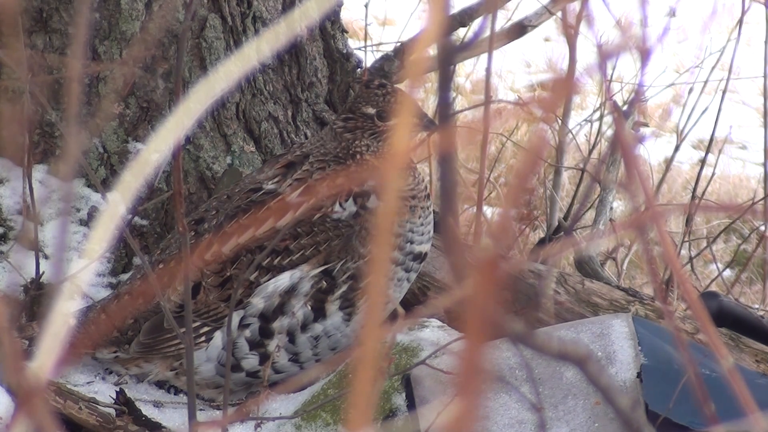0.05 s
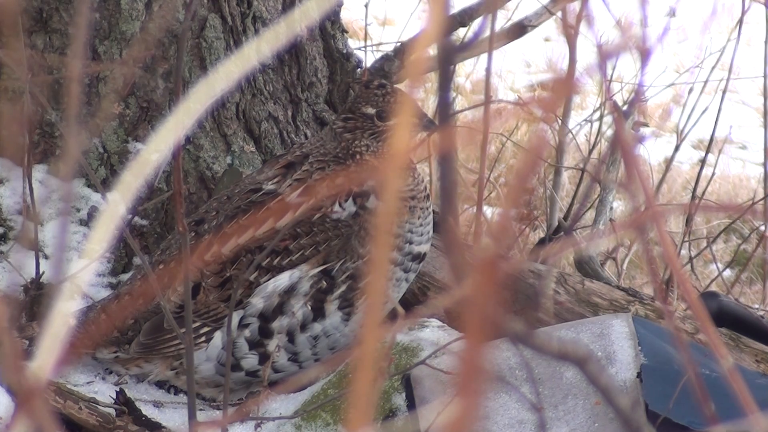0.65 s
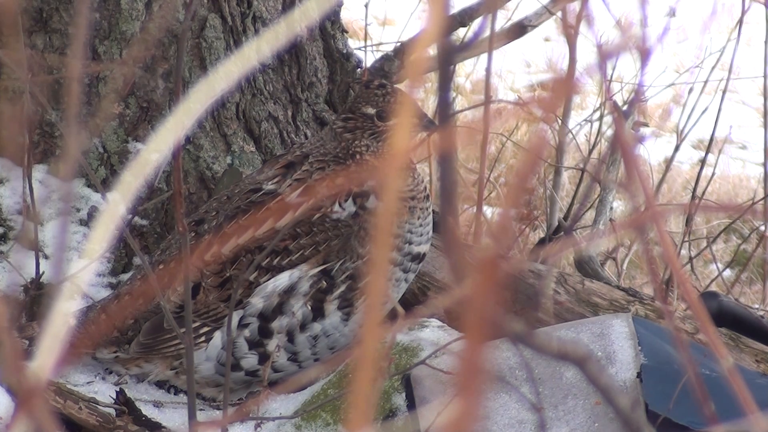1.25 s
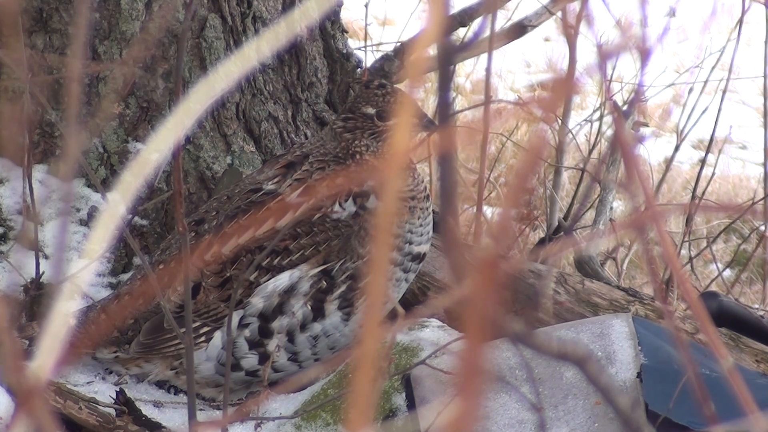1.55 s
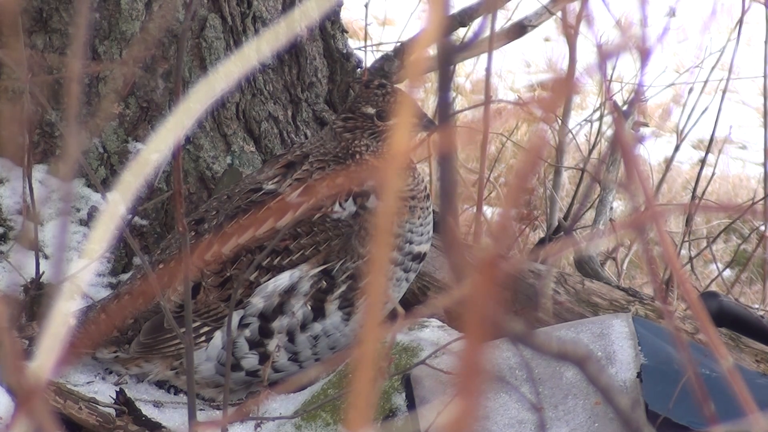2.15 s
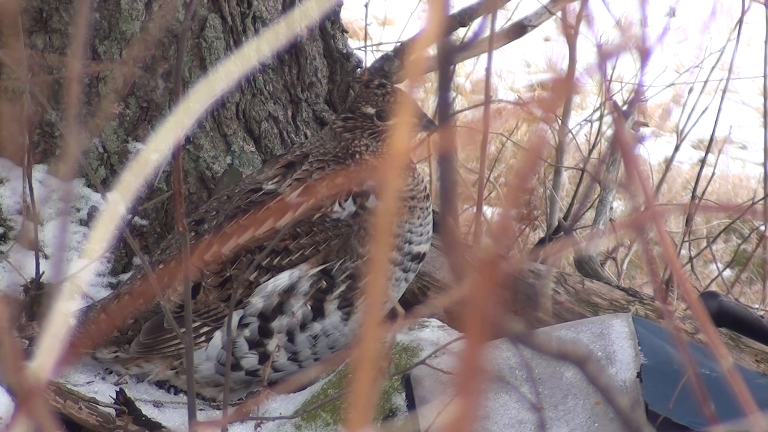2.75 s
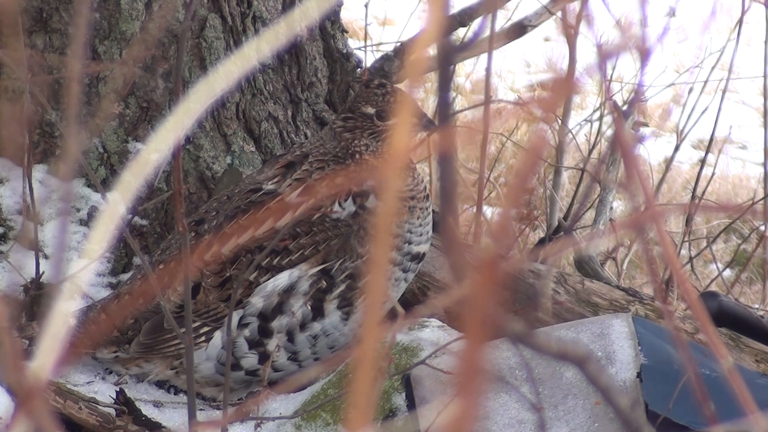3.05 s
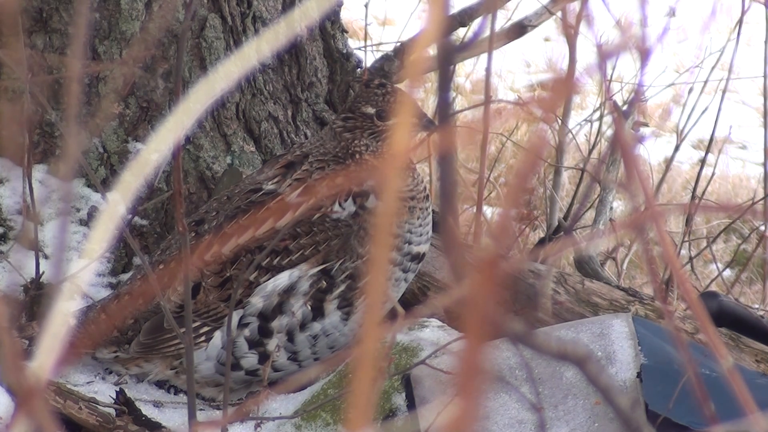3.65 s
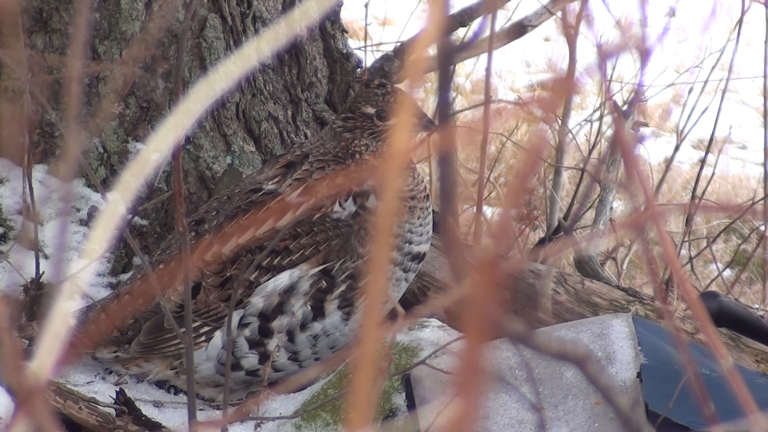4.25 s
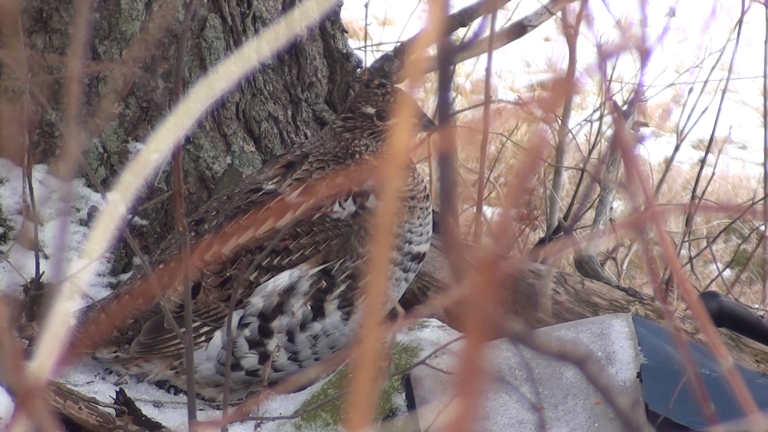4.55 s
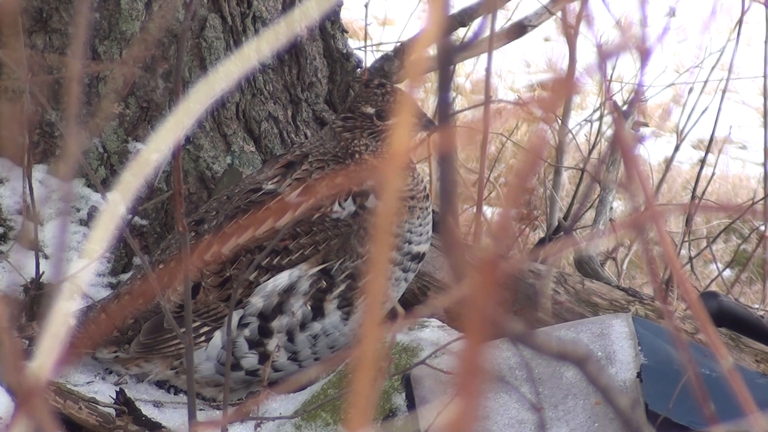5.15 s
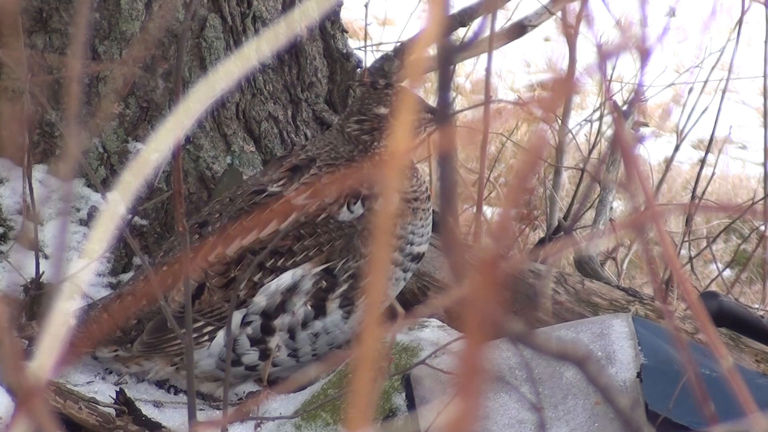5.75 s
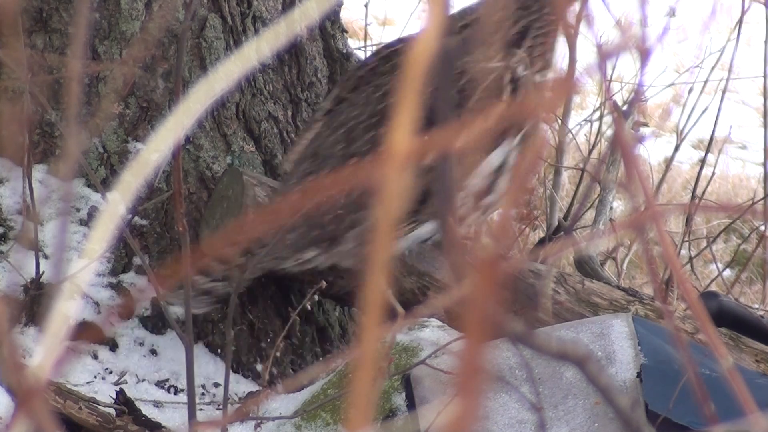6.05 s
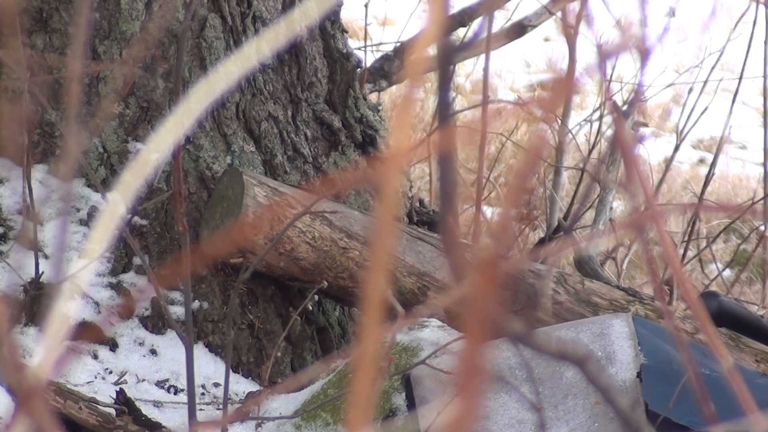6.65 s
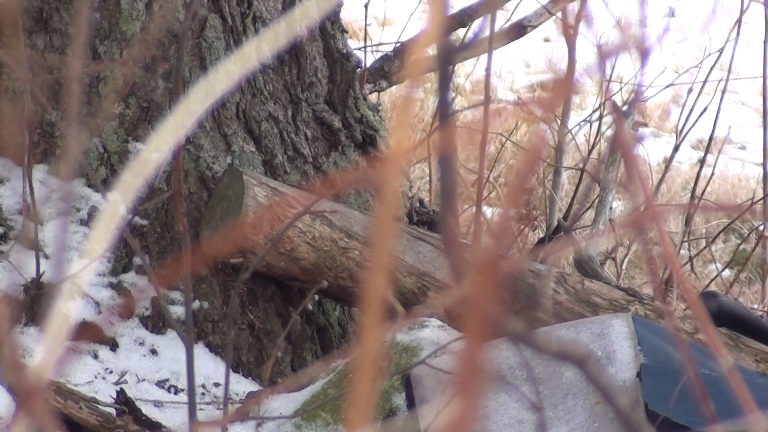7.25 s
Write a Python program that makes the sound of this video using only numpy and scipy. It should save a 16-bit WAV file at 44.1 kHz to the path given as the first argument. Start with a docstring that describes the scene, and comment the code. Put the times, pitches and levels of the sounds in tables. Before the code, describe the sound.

Over a faint outdoor rumble, a bird fidgets, then moves off through dry brush with loud rustling and snapping twigs.

```python
"""A grouse stirs under a tree in a still winter wood, then walks off through dry brush, close by on the left.
Brittle fracture makes leaves and crusted snow crackle in dense grains, and single twigs snap and ring.
Stick-slip friction makes stems rasp and twigs squeak; the leaving bird thumps softly and buffets the air.
Trunks and ground scatter the sounds of the brush. Behind them lie one faint hoot, a far-off rumble
and the camera's own hiss and thin whine."""
import sys
import numpy as np
from scipy import signal
from scipy.fft import rfft, irfft
from scipy.io import wavfile

SR = 44100
rng = np.random.default_rng(int(sys.argv[2]) if len(sys.argv) > 2 else 0)


def generate_wav(signal):
    """Clip the signal to [-1, 1] and save it as 16-bit WAV at the path in sys.argv[1]."""
    frames = np.transpose(np.atleast_2d(signal))
    scaled = np.clip(frames, -1, 1) * 32767
    pcm = np.round(scaled).astype(np.int16)
    wavfile.write(sys.argv[1], SR, pcm)


N = 321489
T = np.arange(N) / SR

# spectra of breaking leaves and of rustling stems: frequency_hz, gain_db
LEAF_SPECTRUM = [(1500, -28.5), (3000, -7), (4500, -7.5), (5500, -4.5), (6500, 0), (7600, 0), (9000, -3.5),
                 (10500, -9), (12500, -15.5), (16000, -17.5)]
STEM_SPECTRUM = [(150, -17.5), (400, -2.5), (750, 4), (1300, 2.5), (2000, 2), (3100, -0.5), (4500, 0),
                 (8000, -29.5)]
# the bird's movements, from fidgets to pushing off: start_s, hold_s, leaf_db, stem_db
MOVEMENTS = [(1.09, .08, -68, -69), (2.62, 0.87, -68.5, -69), (2.68, 0.042, -60, -61),
             (2.86, 0.07, -64, -69), (4.1, 0.32, -72, -73), (4.62, .38, -62, -69), (4.64, 0.024, -70, -58),
             (5.02, .02, -53.5, -53.5), (5.08, 0.068, -44, -51), (5.2, .05, -50.5, -52),
             (5.3, .1, -52, -57.5), (5.42, .5, -45.5, -54), (5.56, .02, -47.5, -49.5),
             (5.7, .01, -45.5, -47.5), (5.96, .36, -43, -49), (6.24, 0.079, -42.5, -45),
             (6.42, .32, -35.5, -41.5), (6.66, 0.024, -36, -42), (6.8, .21, -45.5, -50.5),
             (6.96, .04, -44.5, -53), (7.04, .13, -49, -50), (7.21, 0.057, -45, -52)]
def grouse_rustle(fizz_db=-19):
    """Crackling noise: brisker movement breaks more fibres a second, and the finest of them fizz."""
    leaf_gain, stem_gain = levels(MOVEMENTS, attack_s=.051, release_s=.055)
    spurts_db = 1.06 * walk(rate=110) + .5 * walk(rate=25)
    effort = np.sqrt(leaf_gain / leaf_gain.max())
    leaves = crackle(10000 * effort, LEAF_SPECTRUM, scatter_db=2.4, pan_db=3.6, pan_spread_db=2.6)
    fizz_spectrum = [(6000, -30), (10000, -5), (13000, 0), (16000, -5)]
    fizz = crackle(10000 * effort, fizz_spectrum, scatter_db=2.2, pan_db=3, pan_spread_db=3)
    fizz *= effort ** 2 * undb(fizz_db)
    stems = crackle(3500 * effort, STEM_SPECTRUM, scatter_db=0, pan_db=5.5, pan_spread_db=3)
    rustle = (leaves + fizz) * leaf_gain * undb(spurts_db - .23)
    rustle += stems * stem_gain * undb(spurts_db + .26)
    return rustle, leaf_gain


def crackle(per_s, spectrum, scatter_db, pan_db, pan_spread_db):
    """Shot noise: tiny fractures come at random, each from its own direction; equal power at any rate."""
    breaks = rng.random(N) < per_s / SR
    strength = np.minimum(rng.exponential(size=N), 5)
    clicks = unit(breaks * undb(scatter_db * strength) * rng.choice([-1, 1], N) / np.sqrt(per_s))
    return colour(clicks * pan(pan_db + pan_spread_db * rng.standard_normal(N)), spectrum)


# the loudest twigs: start_s, crack_db, crack_hz, knock_db, knock_hz, decay_s, pan_db
TWIG_SNAPS = [(.6679, -53, 9300, -52, 2700, .006, 4), (2.7089, -64, 7000, -52, 1880, .0034, 3),
              (2.75, -61, 8000, -53, 1900, .005, 3), (2.847, -61, 8070, -54, 1900, .002, 6),
              (2.8747, -49, 7640, -58, 3180, .0024, 3), (2.9228, -63, 6850, -54.5, 1750, .0035, 4),
              (2.938, -60, 7500, -57, 1800, .003, 2), (3.326, -55, 7600, -48, 1570, .007, 5),
              (3.375, -57, 8400, -66, 2000, .002, 3), (4.1552, -53.5, 6760, -58, 1610, .0031, 4),
              (5.022, -47.5, 7730, -44, 970, 0.0066, 4), (5.1016, -37, 8800, -41, 3430, .0036, 2),
              (5.2366, -40, 7260, -50, 4600, .0036, 5), (5.4749, -43.5, 7300, -45, 3240, 0.0018, 7),
              (5.5887, -39.5, 8100, -45, 1830, .0029, 5), (5.6844, -39, 6120, -53, 4220, .002, 5),
              (5.7084, -27.5, 9900, -37.5, 1380, 0.0012, 5.5), (5.8003, -29, 7900, -35.5, 2300, .0009, 3.5),
              (5.83, -40, 7770, -41.5, 1160, 0.0036, 7), (5.8579, -37, 7490, -39.5, 1150, .0018, 1.5),
              (5.9151, -37.5, 6680, -37, 1580, 0.0045, 5), (5.9502, -37.5, 8530, -55.5, 3600, .005, 3),
              (6.0202, -42, 7450, -50, 3770, .003, 0), (6.1048, -37, 6400, -32.5, 1660, 0.0054, 4.5),
              (6.2403, -37, 7700, -40, 1630, .0025, 6), (6.2969, -37, 6780, -47, 1180, .006, 0.5),
              (6.3061, -38, 7200, -37, 1072, .0045, -6), (6.3465, -35.5, 6600, -43, 1550, 0.0072, 3),
              (6.3779, -37, 6270, -35, 4870, .002, 5), (6.4112, -36, 7800, -43, 2020, .003, 2),
              (6.4175, -39, 6420, -37, 2000, .003, 3), (6.5347, -29.5, 9100, -37.5, 651, 0.0011, 3),
              (6.5443, -33, 8000, -55, 4540, 0.0011, 3), (6.5477, -30, 7900, -59, 4390, 0.00097, 8),
              (6.6355, -24.5, 8740, -29.5, 690, 0.0032, 1), (6.6381, -22, 7900, -28.5, 963, 0.0073, 0),
              (6.6463, -26, 7670, -44, 4450, 0.0011, -2), (6.8223, -41, 6765, -44, 3500, 0.002, 2),
              (6.8381, -54, 6930, -40, 3870, .0028, 4), (7.182, -38, 6750, -44, 1270, 0.0075, 5)]
def twig_snaps():
    """Brittle fracture: single twigs bend under the bird until they break."""
    out = np.zeros((2, N))
    for start_s, *twig, pan_db in TWIG_SNAPS:
        add(out, start_s, snap(*twig) * pan(pan_db))
    return out


# spectra of a twig's bright crack and of its lower wooden knock: frequency_hz, gain_db
CRACK_SPECTRUM = [(2000, -7.5), (4000, -11), (6000, -0.5), (8000, 3), (10000, -2), (12000, -11.5),
                  (16000, -13)]
KNOCK_SPECTRUM = [(200, -36), (550, 9), (1100, 3.5), (2300, -1), (4500, 1.5), (8000, -13)]
def snap(crack_db, crack_hz, knock_db, knock_hz, decay_s, trim_db=-5.5):
    """Internal damping: wood stills a twig's crack and knock within a few cycles."""
    crack = fracture(CRACK_SPECTRUM, crack_hz, decay_s, ring_cycles=5, ring_share=.32)
    knock = fracture(KNOCK_SPECTRUM, knock_hz, decay_s, ring_cycles=4, ring_share=.38)
    return crack * undb(crack_db + trim_db) + knock * undb(knock_db + trim_db)


def fracture(spectrum, ring_hz, decay_s, ring_cycles, ring_share, width=.28, size=1024):
    """Free vibration: fibres tear in a dying burst of noise and the twig rings at its natural frequency."""
    t = np.arange(size) / SR
    fibres = rng.standard_normal(size) + width * rng.standard_normal((2, size))
    tear = colour(fibres * np.exp(-t / decay_s), spectrum, size=size // 2)
    ring = np.sin(2 * np.pi * ring_hz * t) * np.exp(-t * ring_hz / ring_cycles)
    return np.sqrt(1 - ring_share) * unit(tear) + np.sqrt(ring_share) * unit(ring)


def small_snaps(leaf_gain, per_s=16, still_db=-67, moderate_db=-49, growth=.78, count=256):
    """Brittle fracture: further small twigs snap at random while the bird moves, harder in a strong rustle."""
    out = np.zeros((2, N))
    times = np.cumsum(rng.exponential(size=count)) / per_s
    for start_s, (strength, pitch) in zip(times, rng.standard_normal((count, 2))):
        rustle_db = 20 * np.log10(leaf_gain[min(int(start_s * SR), N - 1)])
        if start_s < T[-1] and rustle_db > still_db:
            db = moderate_db + growth * (rustle_db - moderate_db) + 1.7 * strength
            knock_hz = 2130 * 2 ** (.464 * pitch)
            small_snap = snap(db - .5, crack_hz=7500, knock_db=db - 1, knock_hz=knock_hz, decay_s=.0032)
            add(out, start_s, small_snap * pan(3))
    return out


# stems dragged along each other: start_s, length_s, resonance_hz, level_db
STEM_SCRAPES = [(5.039, 0.064, 3080, -49.5), (5.098, 0.062, 2870, -48), (6.527, 0.02, 4460, -50)]
def stem_scrapes(ticks_per_s=3000, quality_factor=6):
    """Resonance: a stem catches on another in quick ticks, which excite one of its modes."""
    out = np.zeros((2, N))
    for start_s, length_s, resonance_hz, level_db in STEM_SCRAPES:
        ticks = rng.standard_normal(N) * (rng.random(N) < ticks_per_s / SR)
        n = int(length_s * SR)
        rasp = signal.lfilter(*signal.iirpeak(resonance_hz, quality_factor, fs=SR), ticks[:n])
        add(out, start_s, undb(level_db) * unit(rasp * np.hanning(n)) * pan(4.9))
    return out


# twigs rubbing together: start_s, length_s, from_hz, to_hz, level_db
TWIG_SQUEAKS = [(.601, .0079, 6960, 7000, -47.5), (5.553, 0.021, 1865, 1890, -39.5),
                (6.243, .017, 2810, 5630, -34.5)]
def twig_squeaks(slips_per_s=260):
    """Stick-slip friction: bark on bark gives a brief gliding tone, unsteady in pitch and strength."""
    out = np.zeros((2, N))
    for start_s, length_s, from_hz, to_hz, level_db in TWIG_SQUEAKS:
        n = int(length_s * SR)
        pitch_hz = np.linspace(from_hz, to_hz, n) * (1 + .027 * walk(rate=800)[:n])
        pitch_hz += .08 * (to_hz - from_hz) * walk(slips_per_s)[:n]
        grip = undb(level_db + walk(slips_per_s)[:n]) * np.sqrt(np.hanning(n))
        add(out, start_s, grip * tone(pitch_hz) * pan(4.7))
    return out


# soft thumps of the moving bird: start_s, level_db
BODY_THUMPS = [(4.659, -32.5), (5.409, -45), (6.335, -29), (6.354, -28.5), (6.389, -28), (6.411, -26),
               (6.602, -21.5), (6.635, -26), (6.765, -32)]
def body_thumps(decay_s=.0063, trim_db=-7, size=4096):
    """Heavily damped impulses: the bird gives dull pushes to the ground and the air."""
    out, t = np.zeros((2, N)), np.arange(size) / SR
    spectrum = [(25, -9), (70, -19), (170, -5), (300, -12), (700, -20), (2000, -54)]
    for start_s, level_db in BODY_THUMPS:
        push = colour(rng.standard_normal(size) * np.exp(-t / decay_s), spectrum)
        add(out, start_s, undb(level_db + trim_db) * push / np.abs(push).max())
    return out


# air stirred as the bird leaves: start_s, hold_s, level_db
AIR_BUFFETS = [(6.345, 0.053, -49.5), (6.72, .12, -50.5), (6.98, .1, -55)]
def air_buffets():
    """Pressure fluctuation: moving air makes a low, uneven flutter under the rustle."""
    gain, = levels(AIR_BUFFETS, attack_s=.023, release_s=.27)
    spectrum = [(30, -22), (60, -10), (90, 1), (130, -6.5), (190, -3.5), (280, -16),
                (500, -26), (1500, -54)]
    return colour(rng.standard_normal(N), spectrum) * gain * undb(1.3 * walk(rate=22))


def woodland_echoes(x, near_db=-13, near_s=.0064, far_db=-26, far_s=.07, size=16384):
    """Scattering: nearby trunks and ground return the sound at once; farther trees add a faint tail."""
    t = np.arange(size) / SR
    near, far = rng.standard_normal((2, 2, size)) * (t > .0012)
    near, far = unit(near * np.exp(-t / near_s)), unit(far * np.exp(-t / far_s))
    echoes = (undb(near_db) * near + undb(far_db) * far) / np.sqrt(size)
    return x + signal.fftconvolve(x, echoes, axes=-1)[:, :N]


def distant_hoot(start_s=.59, length_s=.163, from_hz=300, to_hz=352, level_db=-54.5):
    """Frequency glide: a soft, nearly pure tone rises a little as it swells and fades."""
    progress = np.clip((T - start_s) / length_s, 0, 1)
    pitch_hz = from_hz + (to_hz - from_hz) * progress
    return np.sqrt(2) * tone(pitch_hz) * np.sin(np.pi * progress) * undb(level_db)


# spectra of the far-off roar and of the deep bass under it: frequency_hz, gain_db
ROAR_SPECTRUM = [(65, -27), (110, -12), (171, -6), (199, -1.5), (227, -6.5), (342, -3.5), (379, -1.5),
                 (573, 1), (669, -1.5), (781, -0.5), (1380, -14.5), (2400, -27), (3120, -54), (5280, -120)]
BASS_SPECTRUM = [(20, -27), (33, -8), (43, -2), (51, 4.5), (65, 0.5), (90, -3), (125, -4), (180, -11.5),
                 (300, -35.5)]
# swells of the rumble: start_s, hold_s, roar_db, bass_db
RUMBLE_SWELLS = [(.08, 0.11, -53, -66), (1.93, .04, -50.5, -59), (3.19, .27, -52, -57),
                 (3.89, .1, -64, -51), (5.41, 0.035, -43.5, -51), (6.38, .15, -47.5, -55),
                 (7.0, .25, -49.5, -55.5)]
def distant_rumble(roar_db=-51, rise_db_per_s=.56, bass_db=-58.5):
    """Amplitude-modulated noise: a roar like far traffic swells and slowly grows over deep bass."""
    roar_swell, bass_swell = levels(RUMBLE_SWELLS, attack_s=.03, release_s=.06)
    roar_gain = np.hypot(undb(roar_db + rise_db_per_s * T), roar_swell) * undb(.61 * walk(rate=19))
    bass_gain = np.hypot(undb(bass_db), bass_swell) * undb(.8 * walk(rate=4.3))
    mid, side = colour(rng.standard_normal((2, N)), ROAR_SPECTRUM)
    roar = stereo(mid, side, width=[(150, -4.5), (600, -8.5), (1000, -5.5), (1600, -.5)]) * pan(2.3)
    bass = colour(rng.standard_normal(N), BASS_SPECTRUM, size=8192)
    return roar * roar_gain + bass * bass_gain


# spectrum of the hiss and gain of its side signal: frequency_hz, gain_db
HISS_SPECTRUM = [(900, -9.5), (2200, -1.5), (4000, -2.5), (6500, -2.5), (9000, -3.5), (12000, -4),
                 (16000, -4.5)]
HISS_SIDE_GAIN = [(2000, 1.5), (4000, -5.5), (5200, -12), (7000, -10), (10000, -14), (15000, -12)]
def camera_noise(hiss_db=-59, whine_hz=8500, whine_db=-77.5):
    """Self-noise: the camera adds a broadband hiss and a thin, wavering whine."""
    mid, side = colour(rng.standard_normal((2, N)), HISS_SPECTRUM)
    whine = np.sqrt(2) * tone(whine_hz + 25 * walk(rate=91))
    return stereo(mid, side, HISS_SIDE_GAIN) * undb(hiss_db) + whine * undb(whine_db)


def undb(db):
    """Decibels to gain."""
    return 10 ** (np.asarray(db) / 20)


def unit(x):
    """Scale to rms 1."""
    return x / np.sqrt(np.mean(x ** 2) + 1e-20)


def tone(hz):
    """A sine whose phase is the integral of its frequency."""
    return np.sin(2 * np.pi * np.cumsum(hz) / SR)


def colour(x, spectrum, size=2048):
    """Minimum-phase filter with the given (Hz, dB) shape, scaled to unit power gain."""
    hz, db = np.transpose(spectrum)
    f = np.maximum(np.arange(size // 2 + 1) * SR / size, 1)
    cepstrum = irfft(np.log(undb(np.interp(np.log(f), np.log(hz), db))))
    cepstrum[1:size // 2] *= 2
    cepstrum[size // 2 + 1:] = 0
    response = irfft(np.exp(rfft(cepstrum)))
    response /= np.linalg.norm(response)
    response = response.reshape((1,) * (x.ndim - 1) + (-1,))
    return signal.fftconvolve(x, response, axes=-1)[..., :x.shape[-1]]


def walk(rate):
    """Random wander through `rate` points a second, with spread near 1."""
    knots = rng.standard_normal(4096)
    return np.interp(T * rate, np.arange(len(knots)), knots)


def levels(events, attack_s, release_s):
    """Incoherent sum: one gain curve per dB column; each event is at its full from start_s for hold_s."""
    power = 0
    for start_s, hold_s, *dbs in events:
        before_s, after_s = np.maximum(start_s - T, 0), np.maximum(T - start_s - hold_s, 0)
        envelope = np.exp(-before_s / attack_s - after_s / release_s)
        power += (undb(dbs)[:, None] * envelope) ** 2
    return np.sqrt(power + 1e-12)


def pan(db):
    """Channel gains for a level difference, left minus right."""
    return undb(np.array([[.5], [-.5]]) * db)


def stereo(mid, side, width, size=513):
    """Mid-side stereo, the side weighted by a (Hz, dB) curve without delay."""
    hz, db = np.transpose(width)
    f = np.linspace(0, SR / 2, size)
    taps = signal.firwin2(size, f, undb(np.interp(np.log(f + 1), np.log(hz), db)), fs=SR)
    return mid + signal.fftconvolve(side, taps, "same") * np.array([[1], [-1]])


def add(out, start_s, x):
    """Mix a short sound in at its start time."""
    i = max(int(start_s * SR), 0)
    out[:, i:i + x.shape[-1]] += x[..., :max(N - i, 0)]


def scene():
    """Superposition: the bird in the brush sounds in front of the quiet wood."""
    background = distant_rumble() + camera_noise() + distant_hoot()
    body = body_thumps() + air_buffets()
    rustle, leaf_gain = grouse_rustle()
    brush = rustle + twig_snaps() + stem_scrapes() + twig_squeaks() + small_snaps(leaf_gain)
    return woodland_echoes(brush) + body + background


# stereo width by frequency: frequency_hz, side_gain_db
STEREO_WIDTH = [(60, -17), (250, -11), (600, -8.5), (1200, -4), (4000, 1), (5200, 5), (7000, 1),
                (10500, -0.5), (13000, -7), (15000, -36)]
def record(dry, cutoff_hz=15800):
    """Band limiting: the stereo image narrows in the bass and top treble, and a low-pass cuts the top."""
    left, right = dry
    heard = stereo((left + right) / 2, (left - right) / 2, STEREO_WIDTH)
    return signal.sosfilt(signal.ellip(10, .1, 70, cutoff_hz, fs=SR, output="sos"), heard)


dry = scene()
out = record(dry)
generate_wav(out)
```